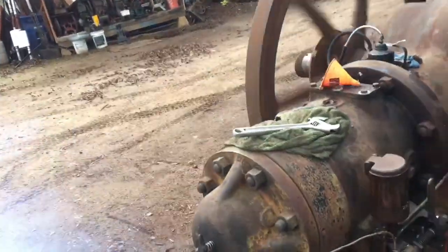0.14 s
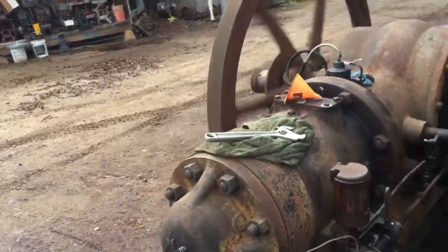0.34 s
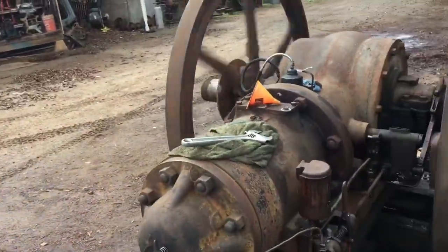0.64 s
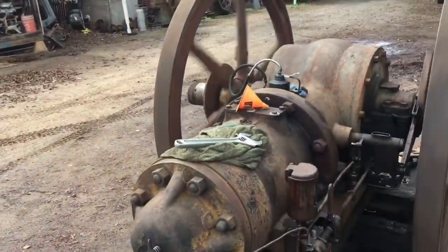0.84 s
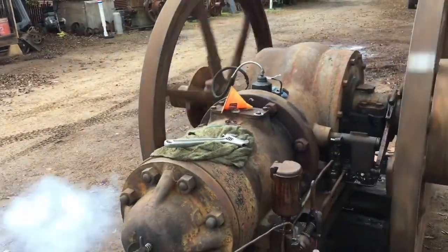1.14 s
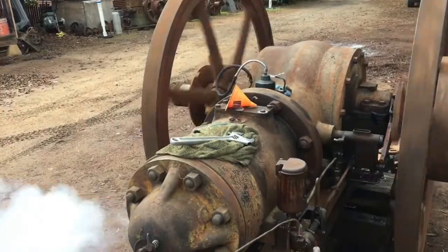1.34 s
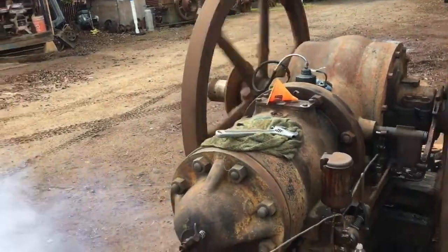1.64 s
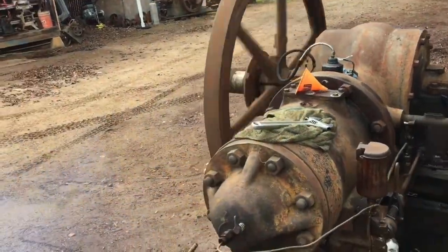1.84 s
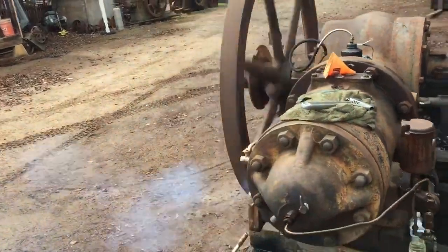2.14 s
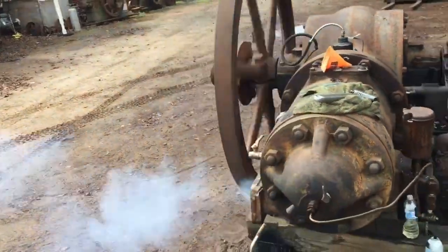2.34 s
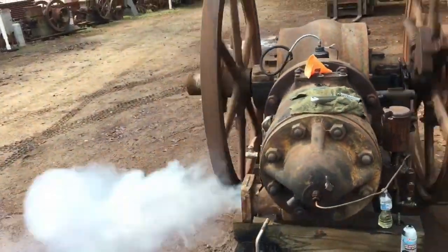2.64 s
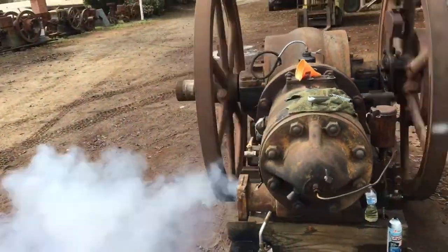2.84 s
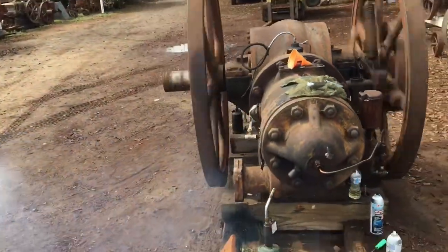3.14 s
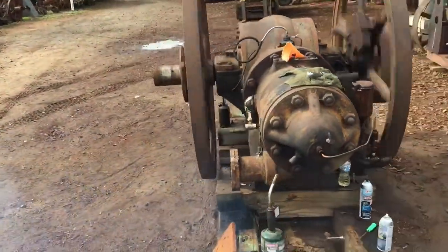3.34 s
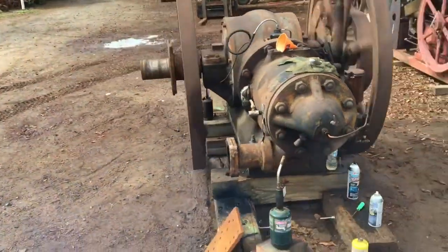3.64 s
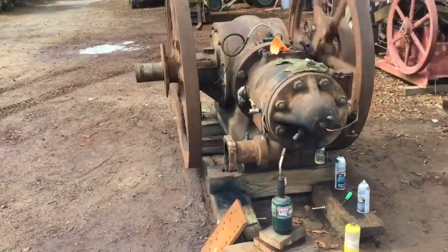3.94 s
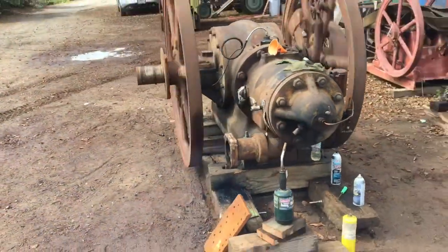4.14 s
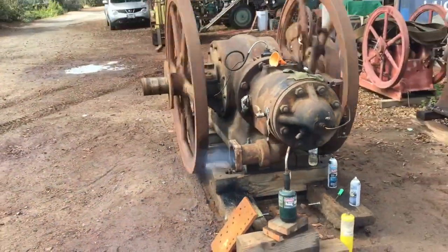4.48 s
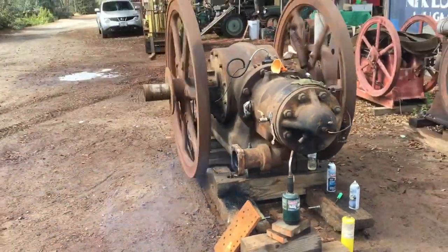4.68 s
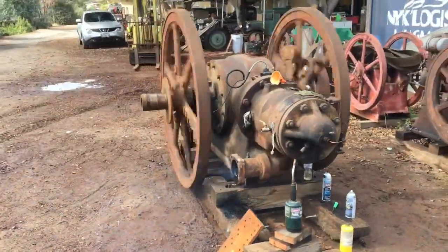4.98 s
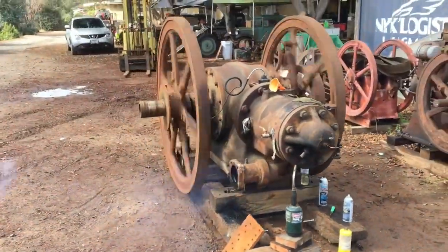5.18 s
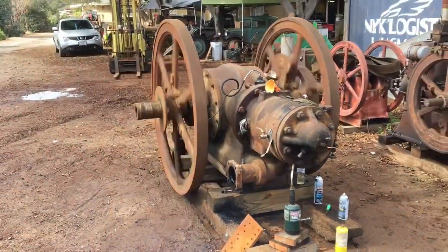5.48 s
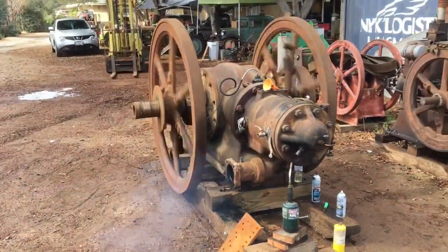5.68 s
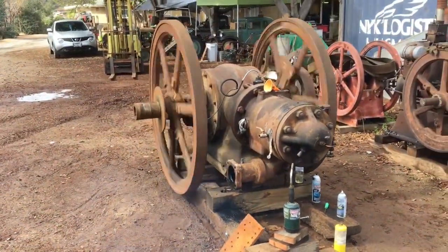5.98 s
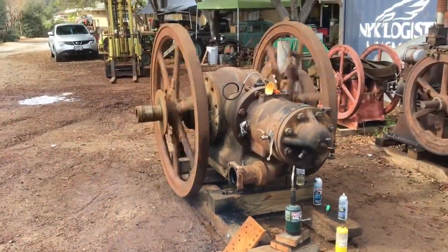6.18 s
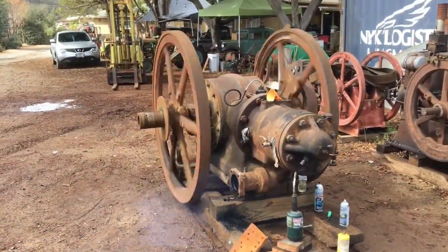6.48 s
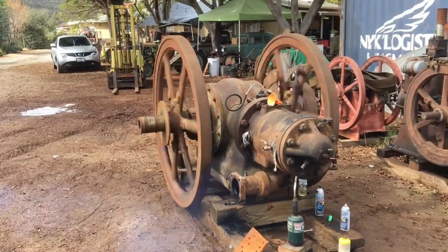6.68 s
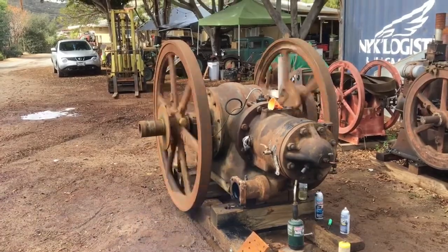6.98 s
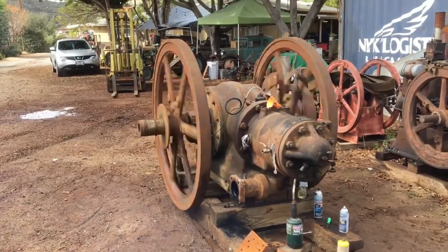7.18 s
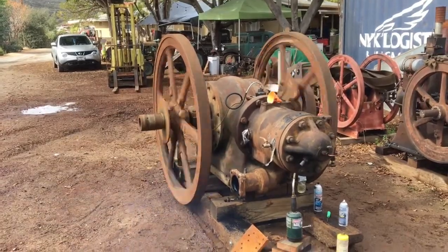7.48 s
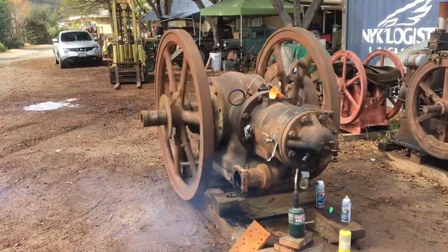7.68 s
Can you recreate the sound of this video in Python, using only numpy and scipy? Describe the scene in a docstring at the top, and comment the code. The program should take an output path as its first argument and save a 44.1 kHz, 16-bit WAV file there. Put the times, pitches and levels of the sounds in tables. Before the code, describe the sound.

A big old single-cylinder engine pops and thumps about six times a second in an open yard, hard exhaust blasts mixed with soft missed strokes.

```python
"""Two-stroke oil engine in a yard

A big single-cylinder engine makes about six turns a second; some fire, some miss. Each turn the exhaust port
opens (damped swings for pop and thump, shaped noise for a firing's blast), then shuts and the pipe rings on;
a valve claps and the piston knocks (struck modes, fading swings, puffs of noise). Hot gas raises the pitches.
The listener walks from the flank to the pipe mouth, amid air noise that follows the crank and blurred echoes."""
import sys
import numpy as np
from scipy import signal
from scipy.fft import rfft, irfft, next_fast_len
from scipy.io import wavfile

SR = 44100
rng = np.random.default_rng(int(sys.argv[2]) if len(sys.argv) > 2 else 0)


def generate_wav(sig):
    """Save sig (samples, or channels by samples) to the path in sys.argv[1] as 16-bit PCM at SR."""
    pcm = np.round(np.clip(np.atleast_2d(sig).T, -1, 1) * 32767).astype(np.int16)
    wavfile.write(sys.argv[1], SR, pcm)


def decibels_to_gain(level_db):
    """Convert a level in decibels to a linear amplitude gain (20 dB per decade)."""
    exponent = np.asarray(level_db, float) / 20
    return 10 ** exponent


N = 344862

# All table levels are relative.
# exhaust port openings: (time [s], fired 1 or missed -1, pop [dB], hiss [dB], bark [dB])
PORT_OPENINGS = [(0.0097, 1, -2.5, -22, -19.5), (0.1821, 1, -2, -18, -17), (0.3533, 1, -1.5, -20, -20),
                 (0.5233, 1, -3.5, -25, -20.5), (0.6929, 1, -4, -24.5, -20.5),
                 (0.8638, -1, -19.5, -53, -59), (1.0347, -1, -22, -70, -45), (1.2056, -1, -40, -67, -31),
                 (1.3765, 1, -1.5, -23.5, -21), (1.5484, 1, -0.5, -16, -18), (1.7191, 1, -9, -57, -37.5),
                 (1.8898, 1, -2, -22, -20.5), (2.0624, -1, -20, -54, -25.5), (2.2351, -1, -17, -54, -26.5),
                 (2.4077, -1, -40, -61, -27), (2.5804, -1, -27, -48, -26), (2.753, 1, -4.5, -54, -30),
                 (2.9299, 1, -1.5, -18.5, -15.5), (3.1028, 1, -4.5, -18, -20), (3.2751, 1, -4.5, -19, -21),
                 (3.4464, 1, -4.5, -17.5, -23), (3.6171, 1, -5.5, -19, -22.5), (3.7868, 1, -5, -20.5, -22),
                 (3.9561, 1, -6, -24, -23), (4.1258, -1, -17.4, -50, -64), (4.2955, 1, -5, -19.5, -23),
                 (4.4652, -1, -21, -45.5, -29.5), (4.635, 1, -2.5, -18.5, -20.5),
                 (4.8037, 1, -6.5, -30, -25.5), (4.974, -1, -16, -41, -29), (5.1443, 1, -4, -20.5, -18.5),
                 (5.3139, 1, -4.5, -21, -23), (5.4843, -1, -17.5, -42, -29.5),
                 (5.6547, 1, -3.5, -16, -17.5), (5.8236, 1, -4, -17.5, -20.5),
                 (5.9919, 1, -5.5, -19.5, -20.5), (6.1609, 1, -10.5, -40, -31),
                 (6.3299, -1, -24, -44.5, -26), (6.4988, -1, -13.5, -38.5, -25),
                 (6.6678, 1, -3, -18, -17.5), (6.8357, 1, -4.5, -15.5, -21), (7.0028, 1, -4.5, -17.5, -21),
                 (7.1693, 1, -5.5, -23, -25), (7.3356, 1, -5, -18.5, -23), (7.5015, -1, -22, -46, -42),
                 (7.6674, 1, -4.5, -19, -21.5)]
# cast-iron modes:
# (frequency [Hz], struck at port [dB], struck at valve [dB], extra at flank [dB], t60 [s])
IRON_MODES = [(473.5, -8.5, -8.5, 8, 0.15), (686.5, 21.5, -12, -36, 0.074), (940, 1.5, 0.5, -2.5, 0.061),
              (1067, -52, -11, 0, 0.028), (1178, -18, -14, 8, 0.073), (1730, -5, -26, -8, .05),
              (2390, -11, -35, -2, 0.025), (3900, -25, -25, 3, 0.049)]
# blast colour at flank and pipe mouth: (frequency [Hz], density [dB per Hz])
BLAST_FLANK_SPECTRUM = [(760, -73), (1300, -19), (1510, -14), (1800, 0), (2020, -26), (2630, -30),
                        (2890, -36.5), (4440, 8), (5480, 40.5), (7590, -6), (12200, 15.5), (16000, 3)]
BLAST_MOUTH_SPECTRUM = [(760, -2), (1300, -23), (1730, -2.5), (1960, -23.5), (2340, -1), (2920, -7.5),
                        (4260, 4), (4630, 2), (6760, -1.5), (7750, -12.5), (8890, -9), (14000, -31),
                        (16000, -73)]
# bark of the blast in the pipe, flank and mouth: (frequency [Hz], width [Hz], level [dB])
BARK_FLANK_PEAKS = [(335.6, 43, 5.5), (595, 37, 2), (803, 31, -26.5), (1125, 148, -1)]
BARK_MOUTH_PEAKS = [(300, 48, -12.5), (541, 11, 6.5), (690, 34, 6), (950, 214, -2), (1290, 390, -36)]
# air noise along the walk: (time [s], rumble [dB], rush [dB], hiss [dB])
WALK_AIR = [(0, -27, -35.5, -40.5), (.9, -34, -38.5, -50.5), (1.5, -27, -31.5, -42), (2.1, -33, -43, -48.5),
            (2.8, -26, -30, -43), (3.4, -33, -39, -45.5), (7.82, -34.5, -39.5, -45)]
# air moved through the cylinder over a turn: (time after port opens [ms], rush [dB], hiss [dB])
BREATHING_CYCLE = [(0, -14.5, -23), (13.1, -2, -4), (43, -1.5, 0), (55.6, 1.5, -6), (83, -17, -12.5),
                   (99.7, -11, -4.5), (114.6, 2.5, -45), (131, -8.5, -1.5), (153, -8.5, -12.5),
                   (167, -7, -23.5), (179, 7, 26)]
# air noise colour: (frequency [Hz], density [dB per Hz])
RUMBLE_SPECTRUM = [(18, -33), (30, -34), (59, 2.5), (102, -2.5), (151, 0.5), (219, -0.5), (287, -14.5),
                   (330, -64), (430, -30), (730, -120)]
HISS_SPECTRUM = [(820, -14), (1400, 2), (1810, -10), (2150, -4.5), (2380, 1.5), (2580, -3), (5060, -10),
                 (5770, -11), (8000, -17.5), (11800, -23), (16000, -28)]
# hollows colouring the air rush, flank and mouth: (frequency [Hz], width [Hz], level [dB])
RUSH_FLANK_PEAKS = [(347, 79, -1), (603, 63, -0.5), (805, 86, -2.5), (1069, 84, 1.5), (1220, 104, -15.5),
                    (1746, 150, -12.5)]
RUSH_MOUTH_PEAKS = [(325, 92, -6), (485, 10, 11.5), (655, 130, 1.5), (932, 26, 6.5), (1110, 62, -20),
                    (1340, 170, -22)]
# yard echoes: (delay [ms], t60 of the blur [ms], at flank [dB], at mouth [dB])
ECHOES = [(7.94, 510, -26.5, -21.5), (49, 124, -15, -33)]
# echo colour at flank and mouth: (frequency [Hz], density [dB per Hz])
ECHO_FLANK_SPECTRUM = [(760, -41), (1300, -16), (1690, 2.5), (2020, -16), (3080, -6), (5370, -14.5),
                       (5840, -6.5), (6350, -12), (13200, -19.5), (16000, -29)]
ECHO_MOUTH_SPECTRUM = [(760, -33), (1300, -1.5), (1460, -6), (1690, -3), (2060, -11.5), (3600, -4.5),
                       (4780, -10), (8980, -13.5), (13700, -21.5), (16000, -32)]
# soft chuff of a charge: (frequency [Hz], width [Hz], level [dB])
CHUFF_PEAKS = [(1900, 75, -4), (2400, 99, -2), (3400, 260, -7), (3900, 510, -12), (6300, 3400, -18.5),
               (11100, 7900, -22)]
# metallic chirps from loose parts: (time [s], frequency [Hz], level [dB], length [ms])
CHIRP_EVENTS = [(.123, 4040, -27, 11.4), (.135, 4200, -40.5, 16), (.235, 5870, -48, 14),
                (.298, 4300, -40, 28), (.406, 5900, -38, 18), (1.328, 8660, -48, 22),
                (1.488, 2400, -33, 27), (1.498, 4380, -38.5, 39), (7.283, 3970, -41, 33),
                (7.27, 2670, -54, 31)]
# share of the view facing the pipe mouth: (time [s], share [0-1])
FACING_MOUTH = [(0, 0.33), (2.6, 0.36), (4.0, 0.7), (7.82, 0.65)]
# hollow breathy tone while the engine coasts: (time [s], level [dB])
HOLLOW_LEVEL = [(2.0, -51), (2.3, -42.5), (2.75, -37), (2.95, -55)]

ROUND_THE_HEAD_S = (2.78, 2.92)   # the walk leaves the flank between these times
SHUT_TURN, CLAP_TURN = (0.337, 0.349), 0.626   # share of a turn after opening; shut: flank, mouth
WEAK_BELOW_HISS_DB = -35   # a firing with less hiss pops and thumps, but chuffs softly instead of blasting


def in_time(rows):
    """Columns joined by straight lines, one value a sample."""
    s, *values = np.transpose(rows)
    return [np.interp(np.arange(N) / SR, s, c) for c in values]


def columns(rows):
    """Start times, then every column as an (events, 1) array."""
    rows = np.array(rows, float)
    return [rows[:, 0], *rows[:, 1:].T[:, :, None]]


def between(pair, share):
    """From the first value to the second."""
    return pair[0] + (pair[1] - pair[0]) * share


def blend(facing, flank, mouth):
    """Equal-power mix of what flank and mouth send."""
    return np.sqrt(1 - facing) * flank + np.sqrt(facing) * mouth


def scatter(s):
    """Chance level step [dB] for each event."""
    return 2.0 * rng.standard_normal((len(s), 1))


def coloured(spectrum):
    """Noise of rms 1 with the given spectrum."""
    hz, db = np.transpose(spectrum)
    size = next_fast_len(N)
    grid_hz = np.maximum(np.arange(size // 2 + 1) * SR / size, 1)
    gain = decibels_to_gain(np.interp(np.log(grid_hz), np.log(hz), db, left=-90, right=-90))
    out = irfft(rfft(rng.standard_normal(size)) * gain, size)[:N]
    return out / out.std()


def resonant(peaks):
    """Noise of rms 1 through parallel two-pole resonances of alternating sign."""
    white, out = rng.standard_normal(N), 0
    for k, (hz, width_hz, db) in enumerate(peaks):
        r = np.exp(-np.pi * width_hz / SR)
        poles = [1, -2 * r * np.cos(2 * np.pi * hz / SR), r * r]
        out = out + (-1) ** k * decibels_to_gain(db) * signal.lfilter([1 - r * r, 0, r * r - 1], poles, white)
    return out / out.std()


def flicker(rate_hz, spread_db):
    """Random gain between chance levels drawn rate_hz times a second."""
    steps = rng.standard_normal(int(N / SR * 1000) + 2)
    return decibels_to_gain(spread_db * np.interp(np.arange(N) / SR * rate_hz, np.arange(len(steps)), steps))


def place(starts, shape):
    """Lays one quarter-second shape(t) per event at its start; one row per event."""
    t = np.arange(SR // 4)[None] / SR
    at = np.round(np.asarray(starts) * SR).astype(int)[:, None] + np.arange(SR // 4)
    out = np.zeros(N + 2 * SR)
    np.add.at(out, at, np.broadcast_to(shape(t), at.shape))
    return out[:N]


def swell(t, rise_s, t60_s):
    """Envelope that rises with a time constant and dies away."""
    return (1 - np.exp(-t / rise_s)) * decibels_to_gain(-60 * t / t60_s)


def surge(t, hz, peak_s, steep):
    """Resonances driving each other: envelope grows to 1, then dies, the steeper the more abruptly."""
    return -(t / peak_s * np.exp(1 - t / peak_s)) ** steep * np.cos(2 * np.pi * hz * t)


def turns():
    """Per turn: opening [s], length [s], fired, pipe heat, firing hardness, side (0 flank, 1 mouth)."""
    s, fired, pop_db, hiss_db, bark_db = columns(PORT_OPENINGS)
    fired = 1.0 * (fired > 0)
    heat_at_start, heat_kept = 0.65, 0.46   # heat 0-1; share kept from turn to turn
    # a firing's heat grows with its hiss, by 1 over 33 dB
    charge = fired * np.clip(2.5 + (hiss_db - 2) / 33, 0, 1)
    heat = signal.lfilter([1 - heat_kept], [1, -heat_kept], charge, axis=0,
                          zi=[[heat_kept * heat_at_start]])[0]
    hard_db, softness_db = -26.5, 5.5   # hiss at half hardness; softness of the step
    hard = fired / (1 + np.exp((hard_db - hiss_db) / softness_db))
    length = np.diff(s, append=2 * s[-1] - s[-2])
    return s, length, fired, heat, hard, np.interp(s, ROUND_THE_HEAD_S, [0, 1])[:, None]


def knock_rows():
    """Knocks run ahead of the next opening, quieter after a hard firing: (time [s], knock [dB], puff [dB])."""
    s, turn, fired, heat, hard, side = turns()
    coming = np.append(fired[1:], fired[-1:], axis=0)
    # lead at the flank; at the mouth before a miss, before a firing
    early_s = np.where(side < 1, 0.031, between((0.0084, 0.0133), coming))
    knock_db = between((-23.5, -24.5), side) + between((-6.5, -40), side) * hard
    relight_db, starve_db = 8, -1   # at the mouth: firing after a miss, miss after a firing
    change_db = side * (relight_db * coming * (1 - fired) + starve_db * fired * (1 - coming))
    return s + turn - early_s[:, 0], knock_db, between((-49, -51.5), side) + change_db


def air(facing, rumble_db, rush_db, hiss_db):
    """Air pumped through crankcase and pipe: rush and hiss follow the crank, a rumble only the walk."""
    now, opened = np.arange(N) / SR, np.array(PORT_OPENINGS)[:, 0]
    last = np.searchsorted(opened, now) - 1
    since_ms = 1000 * np.where(last < 0, now - opened[0] + 0.169, now - opened[last])
    ms, rush_turn_db, hiss_turn_db = np.transpose(BREATHING_CYCLE)
    rush_gain = decibels_to_gain(rush_db + np.interp(since_ms, ms, rush_turn_db)) * flicker(30, 3.0)
    hiss_gain = decibels_to_gain(hiss_db + np.interp(since_ms, ms, hiss_turn_db)) * flicker(60, 1.7)
    rush = rush_gain * blend(facing, resonant(RUSH_FLANK_PEAKS), resonant(RUSH_MOUTH_PEAKS))
    hiss = hiss_gain * coloured(HISS_SPECTRUM)
    return decibels_to_gain(rumble_db) * coloured(RUMBLE_SPECTRUM) + rush + hiss


def hollow_tone():
    """Noise through one narrow resonance."""
    s, db = np.transpose(HOLLOW_LEVEL)
    level = decibels_to_gain(np.interp(np.arange(N) / SR, s, db, left=-99, right=-99))
    return level * resonant([(393, 19, 0)]) * flicker(25.0, 2.3)


def yard(jet, facing):
    """Echoes scattered by machines and a shed wall: the jet's power, late and blurred, plays fresh noise."""
    power, t = 0, np.arange(SR // 5) / SR
    for delay_ms, blur_ms, flank_db, mouth_db in ECHOES:
        blur = np.append(np.zeros(int(delay_ms * SR / 1000)), swell(t, 0.0024, blur_ms / 1000) ** 2)
        sent = jet * decibels_to_gain(between((flank_db, mouth_db), facing))
        power = power + signal.fftconvolve(sent ** 2, blur / blur.sum())[:N]
    side = np.interp(np.arange(N) / SR, ROUND_THE_HEAD_S, [0, 1])
    hiss = blend(side, coloured(ECHO_FLANK_SPECTRUM), coloured(ECHO_MOUTH_SPECTRUM))
    bark = blend(facing, resonant(BARK_FLANK_PEAKS), resonant(BARK_MOUTH_PEAKS))
    return np.sqrt(np.maximum(power, 0)) * (hiss + decibels_to_gain(0.5) * bark) * flicker(70, 3.1)


def chirps():
    """Loose parts ring briefly and roughly: the phase walks at random, which widens each pitch to a band."""
    s, hz, db, ms = columns(CHIRP_EVENTS)
    wobble = np.cumsum(rng.standard_normal((len(s), SR // 4)), axis=1) * 0.2

    def ring(t):
        envelope = swell(t, 0.00059, 0.44) * np.exp(-(1000 * t / ms) ** 3)
        return decibels_to_gain(db) * envelope * np.sin(2 * np.pi * hz * t + wobble)

    return place(s, ring) * flicker(400, 5.0)


def puffs(facing):
    """Small air leaks at valve clap and knock; at the flank a sharp tick runs just ahead of them."""
    opened, turn, fired, heat, hard, side = turns()
    knocked, knock_db, knock_puff_db = knock_rows()
    s = np.append(opened + CLAP_TURN * turn, knocked)
    db = np.append(between((-46, -52.5), side), knock_puff_db, axis=0) + scatter(s)
    soft = place(s - 0.004, lambda t: decibels_to_gain(db + 7.0) * swell(t, 0.0054, 0.11)) * coloured(HISS_SPECTRUM)
    sharp = place(s - 0.011, lambda t: decibels_to_gain(db + 8) * swell(t, 0.00089, 0.028))
    return soft + (1 - facing) * sharp * resonant([(11800, 4000, 0)])


def iron(facing):
    """Shutting port and valve strike the casting at different spots; each blow excites each mode differently."""
    opened, turn, fired, heat, hard, side = turns()
    clank_db = between((-28, -32.5), side) + between((-12, -2), side) * heat + scatter(opened)
    clap_db = -30 - 7.5 * hard + scatter(opened)   # quieter when the firing is hard
    blows = [(opened + turn * between(SHUT_TURN, side[:, 0]), clank_db),
             (opened + turn * CLAP_TURN, clap_db)]
    out = np.zeros(N)
    for hz, port_db, valve_db, flank_db, t60_s in IRON_MODES:
        ringing = 0
        for (s, blow_db), spot_db in zip(blows, (port_db, valve_db)):
            chance = rng.standard_normal((len(s), 3))
            level = decibels_to_gain(blow_db + spot_db + 0.5 + 3.4 * chance[:, :1])
            pitch_hz, phase = hz * (1 + 0.02 * chance[:, 1:2]), 2 * chance[:, 2:]
            ringing = ringing + place(s, lambda t: level * swell(t, 0.0041, t60_s)
                                      * np.sin(2 * np.pi * pitch_hz * t + phase))
        # oil and loose parts roughen the ring
        out += decibels_to_gain(flank_db * (1 - facing)) * ringing * flicker(170, 4.0)
    return out


def knocks():
    """Piston knock: a short hollow burst of several swings, fading gradually."""
    s, knock_db, puff_db = knock_rows()
    knock_db = knock_db + scatter(s)
    return place(s, lambda t: decibels_to_gain(knock_db) * surge(t, 226.6, 0.0051, 0.48))


def pipe_ring():
    """The gas column swings on after the port shuts, stronger when cold; a firing adds a short surge ahead."""
    s, turn, fired, heat, hard, side = turns()
    pop_db, hiss_db = columns(PORT_OPENINGS)[2:4]
    s = s + turn * between(SHUT_TURN, side[:, 0])
    hz = between((135.7, 155.3), heat)   # cold, hot
    # at the flank the hardest firings hold the ring back
    delayed = (side == 0) & (hiss_db > -22.3)
    ring_db = np.where(delayed, -41, between((-11.5, -16), 1 - (1 - heat) ** 2))
    late_db = np.where(delayed, -17, between((-18, -21), heat))
    hold_s = between((0.044, 0.039), side)

    def ring_shape(t):
        envelope = swell(t, 0.0054, 0.23) * (0.32 + np.exp(-(t / hold_s) ** 2.0))
        # starts 2 % sharp and sinks
        return decibels_to_gain(ring_db + 4.5) * envelope * np.sin(2 * np.pi * hz * t * (1.02 - 0.5 * t))

    ring = place(s, ring_shape)
    lead = place(s - 0.017, lambda t: fired * decibels_to_gain(pop_db - 16.5) * surge(t, hz, 0.0036, 4.3))
    late = place(s + 0.0072, lambda t: decibels_to_gain(late_db) * surge(t, 1.015 * hz, 0.02, 3.0))
    return ring + lead + late


def chuffs(facing):
    """A low-hiss charge leaves slowly with a soft hiss; an unfired one adds a hollow rush."""
    weak = [row for row in PORT_OPENINGS if row[3] <= WEAK_BELOW_HISS_DB]
    s, fired, pop_db, hiss_db, bark_db = columns(weak)

    def push(t, length_s):
        return swell(t, 0.017, 0.18) * np.exp(-(t / length_s) ** 4)

    hiss = place(s + 0.006, lambda t: decibels_to_gain(hiss_db + 9.5) * push(t, 0.047)) * resonant(CHUFF_PEAKS)
    rush = place(s + 0.0013, lambda t: (fired < 0) * decibels_to_gain(bark_db + 2.0) * push(t, 0.12))
    hollow = blend(facing, resonant(RUSH_FLANK_PEAKS), resonant(RUSH_MOUTH_PEAKS))
    return flicker(50, 2.0) * (hiss + rush * hollow)


def blast(facing):
    """Turbulent jet of a firing: holds while the cylinder empties, then trails off; the treble ends first."""
    s, fired, pop_db, hiss_db, bark_db = columns([row for row in PORT_OPENINGS if row[1] > 0])
    side = np.interp(s, ROUND_THE_HEAD_S, [0, 1])[:, None]
    jet_db = np.where(hiss_db > WEAK_BELOW_HISS_DB, hiss_db, -99)   # a weak firing keeps only its bark
    # pairs: flank, mouth
    rise_s, late_s = between((0.003, 0.0011), side), between((0.002, 0.0033), side[:, 0])
    trail_db = between((-4, -8.5), side)
    low_hold_s, high_hold_s = between((0.0097, 0.011), side), between((0.0081, 0.0094), side)
    low_t60_s, high_t60_s = [share * between((0.11, 0.088), side) for share in (0.69, 0.62)]

    def holding(t, hold_s, trail_t60_s):
        held = swell(t, rise_s, 0.59) * np.exp(-(t / hold_s) ** 1.61)
        return held + decibels_to_gain(trail_db) * swell(t, rise_s, trail_t60_s)

    def bark_shape(t):
        body = swell(t, 0.006, 0.14) * t / (t + 0.0072) * np.exp(-(t / 0.026) ** 2)
        return decibels_to_gain(bark_db + 9.0) * (body + decibels_to_gain(-10.0) * swell(t, 0.0054, 0.12))

    # gas whistles past the rings just before the port opens
    ahead = place(s - 0.009, lambda t: decibels_to_gain(jet_db + 10.5 - 20.5) * swell(t, 0.0051, 0.031))
    low = ahead + place(s + late_s, lambda t: decibels_to_gain(jet_db + 11.0) * holding(t, low_hold_s, low_t60_s))
    high = ahead + place(s + late_s - 0.0003,
                         lambda t: decibels_to_gain(jet_db + 12.5) * holding(t, high_hold_s, high_t60_s))
    eddies = flicker(190, 2.5) * flicker(800, 3.0)
    noise = eddies * blend(facing, coloured(BLAST_FLANK_SPECTRUM), coloured(BLAST_MOUTH_SPECTRUM))
    dull = signal.lfilter(*signal.butter(2, 5500, fs=SR), noise)
    bright = signal.lfilter(*signal.butter(2, 5500, "high", fs=SR), noise)
    bark = place(s - 0.005, bark_shape)
    pipe = blend(facing, resonant(BARK_FLANK_PEAKS), resonant(BARK_MOUTH_PEAKS))
    return low * dull + high * bright + bark * pipe


def pressure():
    """Pop at the port, then the long gas column's thump; on a miss the pipe sucks in first and swells slower."""
    s, turn, fired, heat, hard, side = turns()
    pop_db = columns(PORT_OPENINGS)[2]
    thump_hz = between((63, 71.8), heat)   # cold, hot
    pop_hz = 190 * (thump_hz / 78.9) ** 0.94   # hotter gas, faster sound
    fired_thump_db = pop_db - between((3.5, 2.4), side)
    missed_thump_db = -14.5 + 0.52 * side * (pop_db + 16)   # follows the pop at the mouth only
    thump_db = np.where(fired, fired_thump_db, missed_thump_db)
    # fired: cold, hot; missed: flank, mouth
    late_s = np.where(fired, between((0.0048, 0.01084), heat), between((0.0081, 0.0109), side))[:, 0]
    pop_peak_s, thump_peak_s = np.where(fired > 0, 0.006, 0.0085), np.where(fired > 0, 0.012, 0.015)
    sign = 2 * fired - 1   # a miss inverts the thump
    pop = place(s, lambda t: decibels_to_gain(pop_db - 1.5) * surge(t, pop_hz, pop_peak_s, 1.66))
    thump = place(s + late_s, lambda t: sign * decibels_to_gain(thump_db + 1.0) * surge(t, thump_hz, thump_peak_s, 2.84))
    leak = place(s - 0.0045, lambda t: decibels_to_gain(pop_db - 11.5) * np.sin(2 * np.pi * 330 * t)
                 * decibels_to_gain(-60 * t / 0.0045))
    return pop + thump + leak


def scene():
    """All parts of the engine, its air noise and its echoes, in mono."""
    facing = np.clip(in_time(FACING_MOUTH)[0], 0, 1)
    jet = blast(facing)
    background = air(facing, *in_time(WALK_AIR)) + hollow_tone() + yard(jet, facing)
    mechanics = chirps() + puffs(facing) + iron(facing) + knocks()
    exhaust = pipe_ring() + chuffs(facing) + jet + pressure()
    return (background + mechanics + exhaust)[None]


def band_limit(x):
    """A steep low-pass at the top of the band."""
    return signal.sosfilt(signal.butter(12, 16800, fs=SR, output="sos"), x)


def record(dry):
    """Rounds off the loudest swings towards a ceiling."""
    ceiling, knee = 0.74, 4
    mix = dry / (1 + np.abs(dry / ceiling) ** knee) ** (1 / knee)
    return band_limit(mix)


dry = scene()
out = record(dry)
generate_wav(out)
```